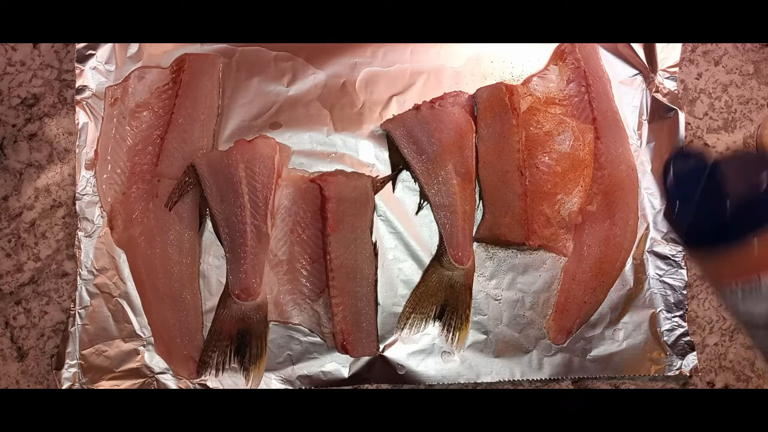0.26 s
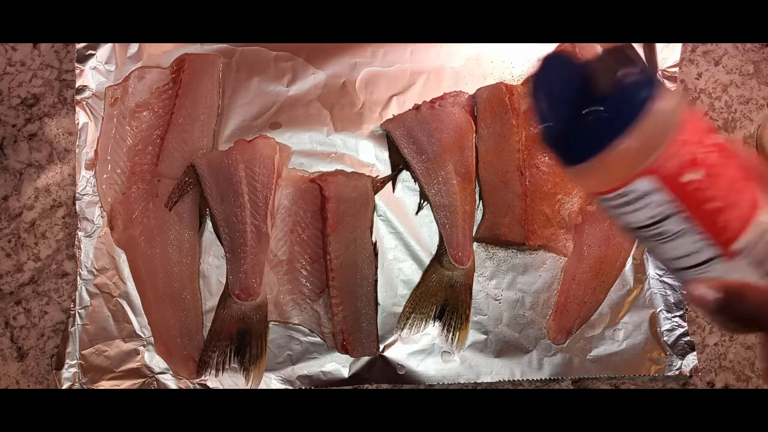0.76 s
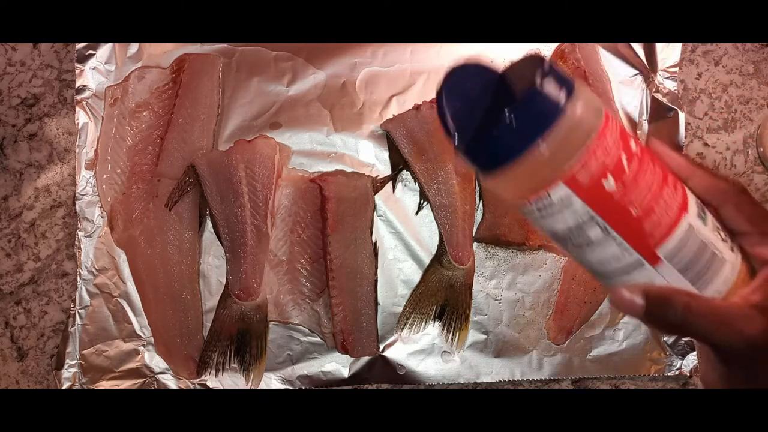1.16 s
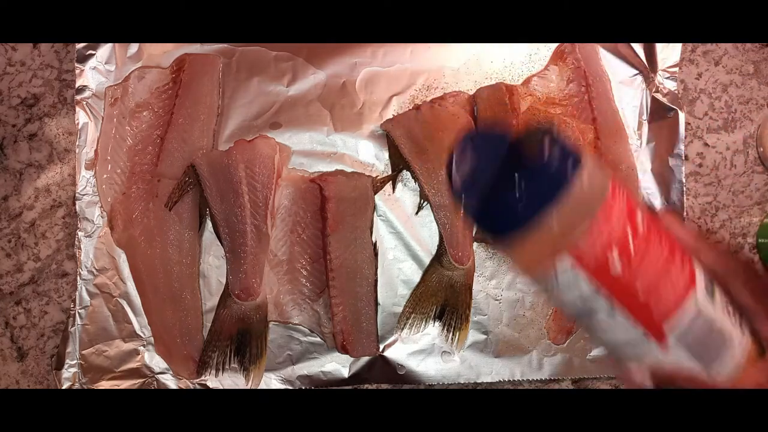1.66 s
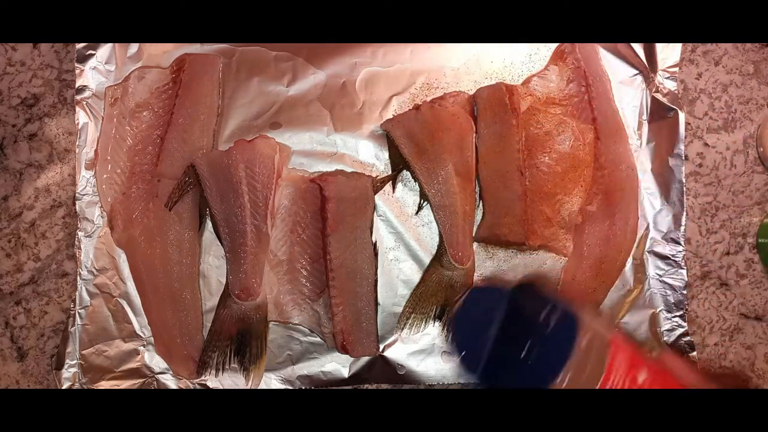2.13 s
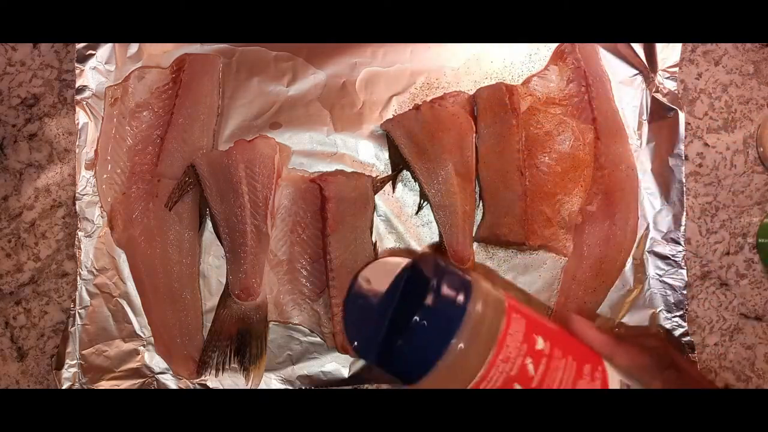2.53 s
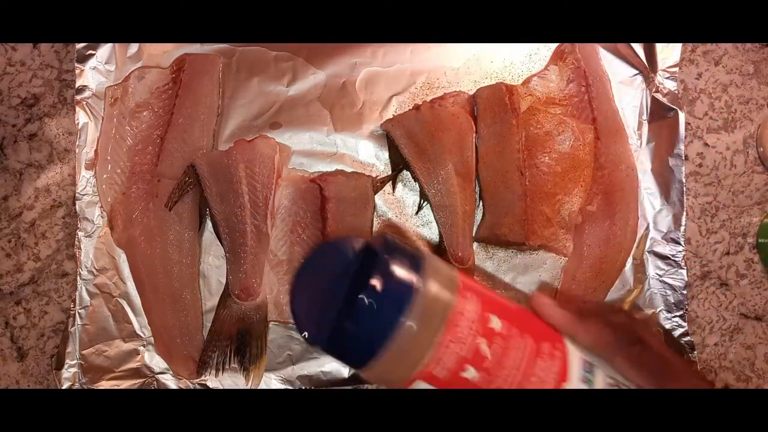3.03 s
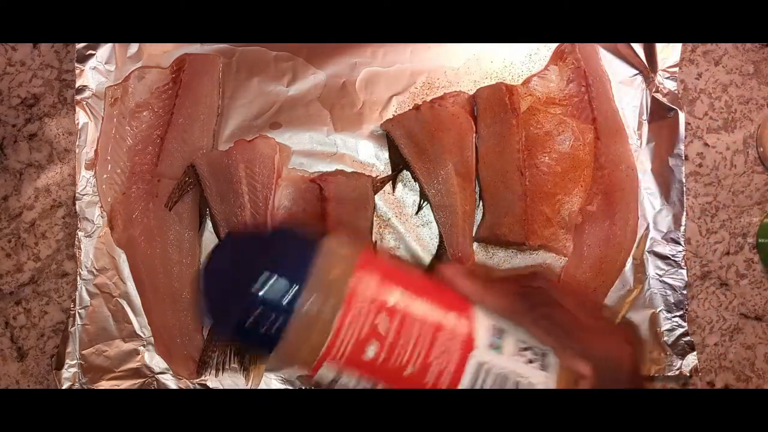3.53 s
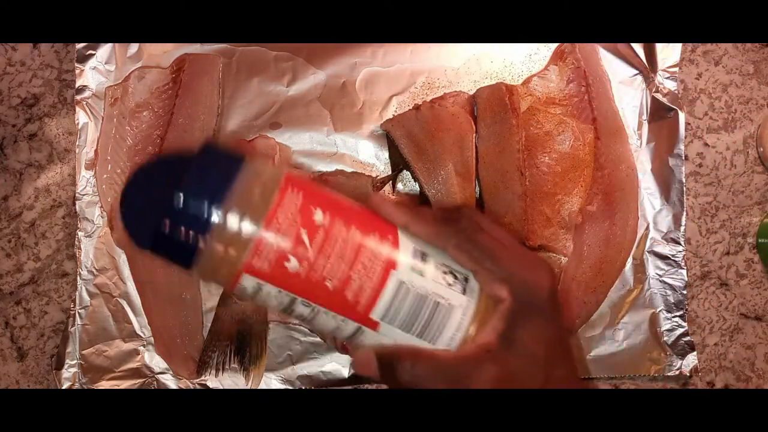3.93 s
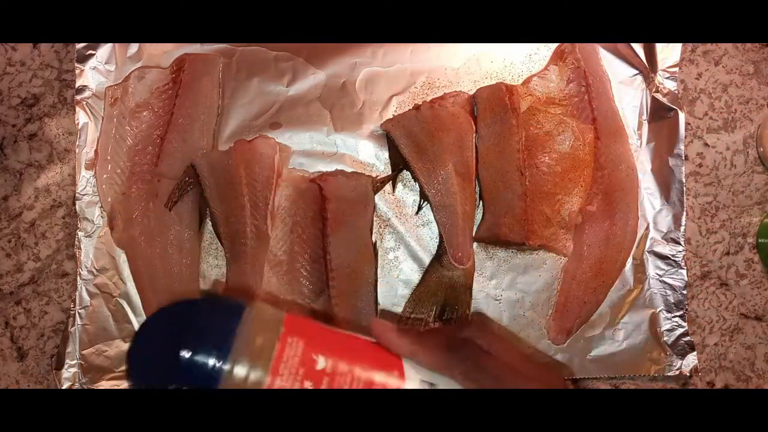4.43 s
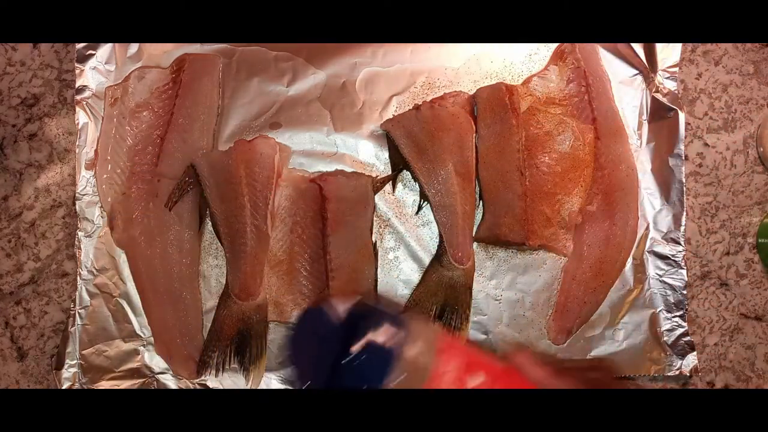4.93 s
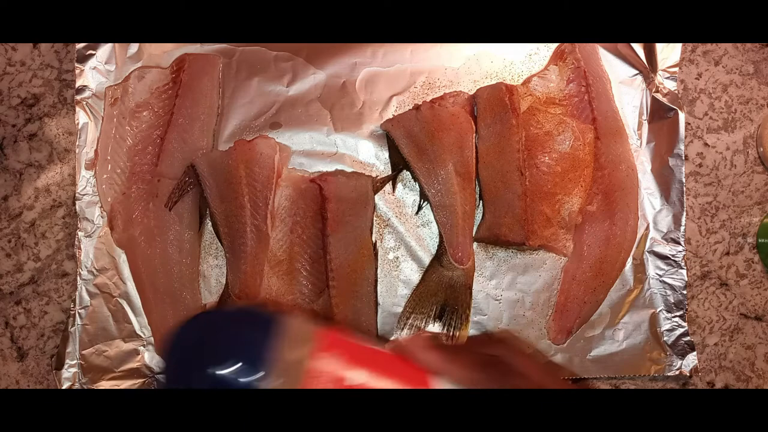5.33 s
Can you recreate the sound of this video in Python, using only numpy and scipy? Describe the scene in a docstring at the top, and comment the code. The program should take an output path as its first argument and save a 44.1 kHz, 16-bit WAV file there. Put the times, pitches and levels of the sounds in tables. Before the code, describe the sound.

A plastic shaker of dry seasoning is rattled in quick strokes, grains pattering and ticking on foil, over a steady low kitchen fan hum.

```python
"""A kitchen fan hums, rumbles and hisses throughout: filtered noise plus two wavering tones.
Over it a plastic shaker of seasoning is shaken over fish on kitchen foil, close to a small microphone.
Random grain impacts patter and tick on the foil, rattle in the cap and slide back after each stroke.
Clumps knock on the bottle as clicks with ringing sines; the finest grains sizzle on bare foil.
The kitchen answers with a short tail of decaying noise."""
import sys
import numpy as np
from scipy import signal
from scipy.fft import rfft, irfft, next_fast_len
from scipy.io import wavfile
from scipy.ndimage import map_coordinates

SR = 44100
rng = np.random.default_rng(int(sys.argv[2]) if len(sys.argv) > 2 else 0)


def persist_wave(psi):
    """Save psi, clipped to +-1, as 16-bit WAV."""
    counts = np.round(np.clip(psi, -1, 1) * 32767).astype(np.int16)
    wavfile.write(sys.argv[1], SR, np.atleast_2d(counts).T)


N = 246078
TIME = np.arange(N) / SR
GRID_SIZE = next_fast_len(N + SR // 2, True)
HZ = np.fft.rfftfreq(GRID_SIZE, 1 / SR)


def amp(db):
    """Decibels to gain."""
    return 10 ** (np.asarray(db) / 20)


def unit(x):
    """x at rms 1."""
    return x / np.sqrt(np.mean(x ** 2))


def along(points, hz=HZ):
    """(Hz, value) points joined on a log frequency axis."""
    f, v = np.transpose(points)
    return np.interp(np.log(hz + 1), np.log(f), v)


def humps(resonances):
    """The dB that (Hz, width Hz, dB) resonances add at each frequency."""
    return sum(db / (1 + (2 * (HZ - hz) / width_hz) ** 2) for hz, width_hz, db in resonances)


def coloured(x, gain_db):
    """x through a causal minimum-phase filter, so that every contact rings after it lands."""
    cepstrum = irfft(np.log(amp(gain_db)), GRID_SIZE)
    cepstrum[1:GRID_SIZE // 2] *= 2
    cepstrum[GRID_SIZE // 2 + 1:] = 0
    response = np.exp(rfft(cepstrum))
    return irfft(rfft(x, GRID_SIZE) * response, GRID_SIZE)[:N]


def below(x, edge_hz):
    """The part of x under a soft edge."""
    return irfft(rfft(x, GRID_SIZE) / (1 + (HZ / edge_hz) ** 10), GRID_SIZE)[:N]


def wobble(knots_per_s):
    """A smooth random curve through random knots."""
    knots = rng.standard_normal(int(N * knots_per_s / SR) + 4)
    return map_coordinates(knots, [TIME * knots_per_s])


def patchy(x, depth_db, width_hz, span_s):
    """x with random swells of colour, each about width_hz wide and span_s long."""
    hz, t, z = signal.stft(x, SR, nperseg=1024)
    rows, cols = np.meshgrid(hz / width_hz, t / span_s, indexing="ij")
    field = map_coordinates(rng.standard_normal((800, 400)), [rows, cols], order=1)
    swells = amp(depth_db * unit(field))
    return signal.istft(z * unit(swells), SR, nperseg=1024)[1][:N]


def surge(start_s, db, rise_s, hold_s, t60_s):
    """Power of a mass of grains that arrives, keeps coming and settles."""
    age = TIME - start_s
    arrival = np.clip(age / rise_s, 0, 1)
    settling_db = -60 * np.clip((age - rise_s - hold_s) / t60_s, 0, 2)
    return (arrival * amp(db + settling_db)) ** 2


FEWEST_GRAINS_PER_S = 350
SWELL_DB, SWELLS_PER_S = 1.9, 110


def contacts(power, full_rate, full_db, clump_db):
    """Random grain impacts carrying this power: a stronger flow has more and harder impacts, in clumps."""
    grains_per_s = full_rate * np.sqrt(power) / amp(full_db)
    chance = np.clip(grains_per_s, FEWEST_GRAINS_PER_S, SR) / SR
    hits = rng.random(N) < chance
    clumping_db = clump_db * unit(np.tanh(wobble(330)))
    flow = unit(amp(clumping_db + SWELL_DB * wobble(SWELLS_PER_S)))
    sizes = unit(rng.choice([-1, 1], N) * amp(2.05 * rng.standard_normal(N)))
    return hits * sizes * flow * np.sqrt(power / chance)


# fan air noise spectrum: (frequency [Hz], gain [dB])
AIR_SPECTRUM = [(15, -31), (30, -21), (48, -16.5), (70, -2.5), (90, 0.5), (120, 0.5), (180, -4), (270, -12),
                (340, -7.5), (420, -8), (490, -10), (550, -7), (600, -8), (650, -20.5), (720, -16),
                (890, -17.5), (1000, -25), (1150, -29.5), (1700, -36)]
# fan hiss spectrum: (frequency [Hz], gain [dB])
HISS_SPECTRUM = [(200, -48), (2000, -43.5), (4500, -40.5), (7300, -35.5), (8200, -60), (10000, -48.5),
                 (16000, -52)]
# fan housing resonances: (frequency [Hz], width [Hz], gain [dB])
HOUSING_RESONANCES = [(87, 19, 5), (146, 11.7, 13), (162.2, 14.5, 12), (199.3, 6.6, 7.5), (326.5, 19, 4),
                      (367, 8, 7), (374, 18, 5), (818, 12, 7.5)]
# motor tones, before waver: (frequency [Hz], rms level [dB])
MOTOR_TONES = [(143.5, -55), (161, -52.5)]
NOISE_DB = -29  # drive of air and hiss, before their spectra
LUMP_DB, LUMPS_PER_S = 1.2, 14
HUM_WAVER_DB, HUM_WANDER_HZ = 2.6, 1.22


def fan():
    """Turbulent air rushes through a resonant housing, with two wavering motor tones and a faint hiss."""
    air_db = along(AIR_SPECTRUM) + humps(HOUSING_RESONANCES)
    air = amp(NOISE_DB) * coloured(rng.standard_normal(N), air_db)
    air = patchy(air, depth_db=3, width_hz=71.4, span_s=0.06)
    rumble = below(air, edge_hz=320)
    lumpy_rumble = rumble * amp(LUMP_DB * wobble(LUMPS_PER_S))
    rush = (air - rumble) * amp(0.33 * wobble(22))
    hiss = amp(NOISE_DB) * coloured(rng.standard_normal(N), along(HISS_SPECTRUM))
    hum = np.zeros(N)
    for hz, db in MOTOR_TONES:
        phase = 2 * np.pi * np.cumsum(hz + HUM_WANDER_HZ * wobble(6)) / SR
        hum += np.sqrt(2) * amp(db + HUM_WAVER_DB * wobble(5)) * np.sin(phase)
    return below(lumpy_rumble + rush, edge_hz=3150) + hiss + hum


# hand strokes, also played by strays() and shaker(): (time [s], rattle level [dB], rise [s],
# length with rise [s], bottle wall gain [dB], foil spill level [dB], spill lead [s])
HAND_STROKES = [(0.08, -31.5, 0.0054, 0.02, 2.5, -78, .034), (0.348, -32.5, 0.0041, 0.015, 0.5, -67, .046),
                (0.65, -41, 0.016, 0.048, -9, -76, .04), (0.869, -37.5, 0.028, 0.05, -1.5, -80, .02),
                (1.015, -38, 0.019, 0.076, -5, -63, 0.027), (1.194, -37.5, 0.022, 0.056, -4, -64, .03),
                (1.316, -34, 0.017, 0.084, -2.5, -62, .04), (1.444, -33.5, 0.021, 0.043, -2.5, -51, 0.032),
                (1.542, -38, 0.005, 0.018, -3, -49, 0.036), (1.598, -35.5, 0.018, 0.099, -4.5, -52, 0.044),
                (1.799, -36.5, 0.02, 0.051, -1.5, -37.5, 0.052), (1.906, -54, 0.013, 0.17, 4, -52, .04),
                (2.082, -35.5, 0.011, 0.049, 0, -53, 0.074), (2.217, -37.5, 0.0029, 0.035, 4, -40, 0.032),
                (2.301, -36, 0.0034, 0.045, 0, -47, 0.047), (2.457, -32, 0.0039, 0.025, -2, -50, 0.037),
                (2.604, -36.5, 0.0047, 0.037, -0.5, -49, 0.019),
                (2.769, -32.5, 0.0038, 0.014, -1, -46, 0.045),
                (2.917, -35.5, 0.015, 0.03, -2, -43.5, 0.042), (3.846, -37, 0.005, 0.024, 0, -42, 0.076),
                (4.007, -37.5, 0.015, 0.035, 3.5, -41, 0.064), (4.088, -46, 0.0065, 0.071, -5, -63, 0.018),
                (4.855, -46.5, 0.011, 0.031, 1.5, -46.5, 0.052),
                (5.007, -37.5, 0.006, 0.071, 3, -49, 0.062), (5.474, -45.5, .004, 0.069, -1.5, -71, .04)]
# light flicks that only sprinkle the foil: (time [s], level [dB], length with rise [s])
LIGHT_FLICKS = [(0.452, -43, 0.019), (0.573, -51, 0.025), (3.038, -49.5, 0.035), (3.14, -63, 0.04),
                (3.189, -62.5, 0.079), (3.634, -45.5, 0.08), (4.132, -42, 0.028), (4.202, -52, 0.078),
                (4.52, -38.5, 0.035), (4.631, -51, 0.046), (4.71, -56, 0.11), (5.403, -50.5, 0.031)]
# spectrum of one foil contact: (frequency [Hz], gain [dB])
FOIL_SPECTRUM = [(500, -53), (2000, -21.5), (4000, -11), (6500, -3.5), (10000, -10.5), (13000, -3.5),
                 (16000, -0.5)]
SPILL_RISE_S = 0.016  # the foremost grains fly out until the mass hits the cap
FLICK_RISE_S, PATTER_T60_S = 0.0096, 0.068


def patter():
    """Every stroke and flick sends a shower of loose grains onto the foil."""
    power = np.zeros(N)
    for s, *_, db, lead_s in HAND_STROKES:
        power += surge(s - lead_s, db, SPILL_RISE_S, lead_s - SPILL_RISE_S, PATTER_T60_S)
    for s, db, length_s in LIGHT_FLICKS:
        power += surge(s, db, FLICK_RISE_S, length_s - FLICK_RISE_S, PATTER_T60_S)
    impacts = contacts(power, full_rate=6000, full_db=-38, clump_db=0.5)
    landing = coloured(impacts, along(FOIL_SPECTRUM))
    return patchy(landing, depth_db=2, width_hz=634, span_s=0.046)  # each crease has its own colour


STRAY_DELAY_S, STRAY_FADE_DB_PER_S = 0.098, 85  # mean delay; later ones are softer
STRAY_DB, STRAY_SPREAD_DB = 0, 2  # over the stroke's rattle level; scatter


def strays(count=4):
    """Rows (time [s], level [dB], brightness [dB]) of the few grains that each stroke shakes loose."""
    rows = []
    for s, db, *_ in HAND_STROKES:
        for delay_s in STRAY_DELAY_S * rng.exponential(size=count):
            scatter_db = STRAY_SPREAD_DB * rng.standard_normal()
            rows.append((s + delay_s, db + STRAY_DB - STRAY_FADE_DB_PER_S * delay_s + scatter_db, 0))
    return [row for row in rows if row[0] < TIME[-1]]


# single coarse grains: (time [s], level [dB], treble gain [dB])
COARSE_GRAINS = [(0.048, -39, 6), (0.1647, -25, -3), (0.304, -35, 6), (0.312, -29, 0), (0.338, -34, -16),
                 (0.548, -25.5, -5), (0.576, -31, -9), (0.6537, -27, -9), (0.809, -33.5, 4),
                 (0.989, -28, -5), (1.02, -26, 0), (1.1645, -32, -4), (1.1957, -30, 11), (1.3204, -15, -3),
                 (1.5204, -20.5, -3), (1.601, -17.5, -10), (1.7593, -27, -4), (1.912, -23.5, -3),
                 (1.93, -21, -5), (1.999, -25.5, -3), (2.0775, -18, -3), (2.408, -24, 10),
                 (2.583, -21.5, 6), (2.6156, -12, -5), (2.7284, -29.5, 11), (2.8751, -35, 7),
                 (2.901, -27, 8), (3.0808, -35.5, 14), (3.1395, -48, 16), (3.209, -39, 8.5),
                 (3.259, -44, 1), (3.402, -20, 1.5), (3.477, -31.5, -17), (3.568, -30, -1.5),
                 (3.6346, -36, 7), (3.777, -26.5, 2), (3.9243, -23.5, -11), (3.947, -24.5, -5),
                 (4.2075, -34, 9), (4.255, -31, 0), (4.411, -43.5, 20), (4.469, -44, 10),
                 (4.523, -29.5, 10), (4.6163, -23, -4), (4.71, -32.5, 15), (4.798, -41, 11),
                 (4.8158, -38, 8), (4.8295, -30.5, 2), (4.881, -26, -9), (4.958, -35, 2), (5.186, -31, -1),
                 (5.217, -40, 7), (5.312, -33.5, -5), (5.411, -31, 4), (5.4205, -25, -9), (5.48, -19.5, -7)]
# spectrum of one coarse grain contact: (frequency [Hz], gain [dB])
COARSE_SPECTRUM = [(500, -50), (2500, -46), (4600, -1), (7000, 1), (10000, -5.5), (16000, 0)]
SNAP_DB, CRACK_DB, SKITTER_DB = -3, -4, 1.7  # relative to the grain's level


def ticks():
    """A coarse grain snaps onto the foil, crumbles, then skitters in tiny bounces."""
    dull, bright = np.zeros(N), np.zeros(N)
    t = np.arange(SR // 10) / SR
    for s, db, bright_db in COARSE_GRAINS + strays():
        snap = t == 0
        bounces = rng.standard_normal(len(t)) * (rng.random(len(t)) < 0.03)
        skitter = amp(-60 * t / 0.05) * bounces
        skitter /= np.linalg.norm(skitter)
        crack = amp(-60 * t / 0.006) * rng.standard_normal(len(t))
        crack /= np.linalg.norm(crack)
        tick = amp(db) * (amp(SNAP_DB) * snap + amp(CRACK_DB) * crack + amp(SKITTER_DB) * skitter)
        start = round(s * SR)
        dull[start:start + len(t)] += tick[:N - start]
        bright[start:start + len(t)] += tick[:N - start] * amp(bright_db)
    tilted = bright + below(dull - bright, edge_hz=9900)  # dull lows, bright highs
    return coloured(tilted, along(COARSE_SPECTRUM))


# spectrum of one cap contact, also used by knocks(): (frequency [Hz], gain [dB])
CAP_SPECTRUM = [(400, -37), (1200, -23), (2000, -23.5), (3000, -11), (4000, -2), (5000, -2), (6700, 1.5),
                (8300, -7), (10300, -8), (13000, -5.5), (16000, -1.5)]
# plastic bottle resonances, also used by knocks(): (frequency [Hz], width [Hz], gain [dB])
BOTTLE_RESONANCES = [(2370, 61, 5), (2800, 110, 2), (3530, 220, 0), (5550, 490, 4)]
SETTLE_T60_S = 0.079  # the piled grains come to rest
# the load slides back after a stroke; SLIDE_DB is over the stroke's level
SLIDE_GAP_S, SLIDE_DB, SLIDE_HOLD_S, SLIDE_T60_S, SLIDE_WALL_DB = 0.064, -18.5, 0.016, 0.23, -3


def shaker():
    """Seasoning rattles against the cap and slides back softly; each stroke sounds the bottle's wall."""
    power, wall_power = np.zeros(N), np.zeros(N)
    for s, db, rise_s, length_s, wall_db, *_ in HAND_STROKES:
        stroke = surge(s, db, rise_s, length_s - rise_s, SETTLE_T60_S)
        slide_s = s + length_s + SLIDE_GAP_S
        slide = surge(slide_s, db + SLIDE_DB, rise_s, SLIDE_HOLD_S, SLIDE_T60_S)
        power += stroke + slide
        wall_power += stroke * amp(wall_db) ** 2 + slide * amp(SLIDE_WALL_DB) ** 2
    impacts = contacts(power, full_rate=3200, full_db=-35, clump_db=0.5)
    rattle = coloured(impacts, along(CAP_SPECTRUM) + humps(BOTTLE_RESONANCES))
    wall = below(rattle, edge_hz=6370)
    # the shifting load damps the wall differently from moment to moment
    loaded_wall = patchy(wall, depth_db=2.5, width_hz=159.3, span_s=0.04)
    cap = patchy(rattle - wall, depth_db=2.5, width_hz=441, span_s=0.025)
    return cap + loaded_wall * np.sqrt(wall_power / (power + 1e-14))


# clumps that knock on the bottle, pitched by where they land:
# (time [s], level [dB], ring frequency [Hz], ring gain [dB])
CLUMP_KNOCKS = [(0.0825, -22.5, 2400, -12), (0.087, -16, 3490, -9), (0.0966, -24, 7200, -3),
                (0.1008, -22.5, 7150, -7), (0.3509, -22, 3940, -10), (0.553, -23, 5530, -11),
                (0.577, -33, 3080, -6.5), (0.911, -23, 7300, -24), (1.2224, -25, 6700, -12),
                (1.344, -16.5, 6800, -5.5), (1.392, -27, 6750, -5), (1.4024, -17.5, 6930, -7.5),
                (1.485, -19.5, 6600, -4), (1.8337, -23.5, 4450, -2.5), (2.103, -19, 4320, -6.5),
                (2.2228, -19.5, 2220, -12.5), (2.3055, -17, 6550, -9), (2.4573, -26, 7100, -5),
                (2.4645, -18, 6050, -2.5), (2.609, -26, 6900, -7), (2.776, -17, 6330, -9),
                (3.847, -19, 6800, -7), (4.0195, -18, 7050, -5), (4.861, -26, 7080, -7),
                (5.0098, -23, 6600, -6), (5.4797, -18, 5370, -11)]
KNOCK_T60_S, RING_T60_S = 0.011, 0.047
KNOCK_BODY_DB = 0  # a clump sounds the bottle's wall more than single grains do
RING_WANDER_RAD, RING_WANDERS_PER_S = 1.1, 170


def knocks():
    """A clump lands with a hard, gritty click; the plastic rings briefly, its pitch unsettled by the load."""
    clicks, rings = np.zeros(N), np.zeros(N)
    t = np.arange(SR // 10) / SR
    wander = RING_WANDER_RAD * wobble(RING_WANDERS_PER_S)
    for s, db, hz, ring_db in CLUMP_KNOCKS:
        start = round(s * SR)
        span = slice(start, start + len(t))
        click = amp(-60 * t / KNOCK_T60_S) * rng.standard_normal(len(t))
        clicks[span] += amp(db - 2.5) * click / np.linalg.norm(click)
        ring = np.sin(2 * np.pi * hz * t + wander[span])
        rings[span] += amp(db + ring_db - 13.5 - 60 * t / RING_T60_S) * ring
    body = amp(KNOCK_BODY_DB) * below(clicks, edge_hz=3300)
    return coloured(clicks + body, along(CAP_SPECTRUM) + humps(BOTTLE_RESONANCES)) + rings


# puffs of the finest grains: (time [s], level [dB], hold [s])
FINE_PUFFS = [(1.625, -40, .04), (2.409, -39, .012), (2.736, -41, .014), (2.869, -41, .035),
              (4.53, -38.5, .015), (4.815, -43, .025)]
# spectrum of one fine grain on bare foil: (frequency [Hz], gain [dB])
FINE_SPECTRUM = [(500, -60), (4000, -32), (6700, -12), (8500, -17), (10300, -10), (13000, -7), (15000, 0)]
SPRAY_RISE_S, SPRAY_T60_S = 0.004, 0.07


def sprays():
    """The finest grains land on bare foil with a thin, very bright sizzle."""
    power = sum(surge(s, db, SPRAY_RISE_S, hold_s, SPRAY_T60_S) for s, db, hold_s in FINE_PUFFS)
    impacts = contacts(power, full_rate=1800, full_db=-42, clump_db=1.5)
    return coloured(impacts, along(FINE_SPECTRUM))


# kitchen reverberation: (frequency [Hz], T60 [s])
KITCHEN_T60 = [(200, 0.24), (4000, 0.43), (8000, 0.3), (16000, 0.24)]


def kitchen(x, count=48):
    """Hard walls return a short diffuse tail, shortest at the extremes; it changes as the shaker moves."""
    wet = np.zeros(N + SR)
    for stretch in np.array_split(np.arange(N), count):
        hz, t, z = signal.stft(rng.standard_normal(SR // 3), SR, nperseg=256)
        decay = amp(-60 * t / along(KITCHEN_T60, hz)[:, None])
        tail = signal.istft(z * decay, SR, nperseg=256)[1]
        answer = signal.fftconvolve(x[stretch], tail / np.linalg.norm(tail))
        wet[stretch[0]:stretch[0] + len(answer)] += answer
    return wet[:N]


def scene():
    """Shaker and foil in the kitchen, over the fan."""
    grains = patter() + ticks() + amp(1.5) * sprays()
    seasoning = grains + amp(-0.04) * shaker() + knocks()
    return (fan() + seasoning + amp(-5) * kitchen(seasoning))[None]


# microphone port resonances: (frequency [Hz], width [Hz], gain [dB])
PORT_RESONANCES = [(6900, 1990, 11), (10330, 2100, 14.5), (15000, 600, 6.5), (15160, 490, 8.5)]
TOP_HZ = 15900


def record(dry):
    """The microphone's port rings in the treble; nothing passes above the band limit."""
    heard = coloured(dry[0], humps(PORT_RESONANCES) - 1)
    return irfft(rfft(heard, GRID_SIZE) * (HZ < TOP_HZ), GRID_SIZE)[None, :N]


dry = scene()
out = record(dry)
persist_wave(out)
```